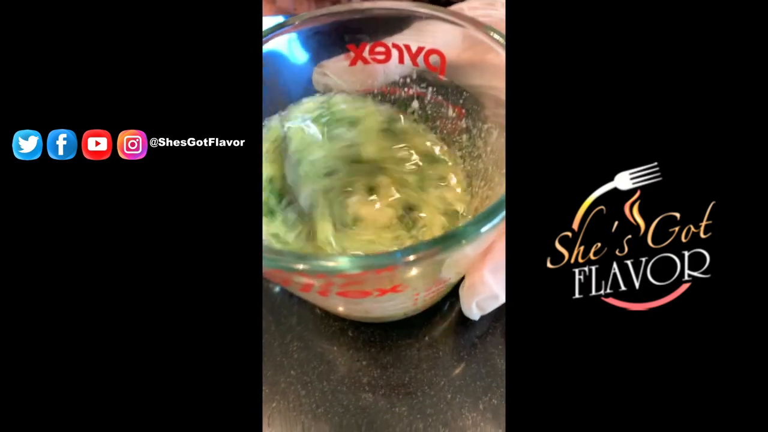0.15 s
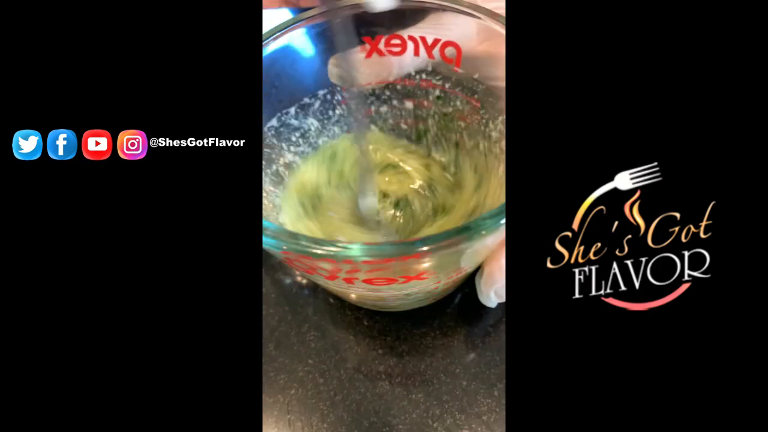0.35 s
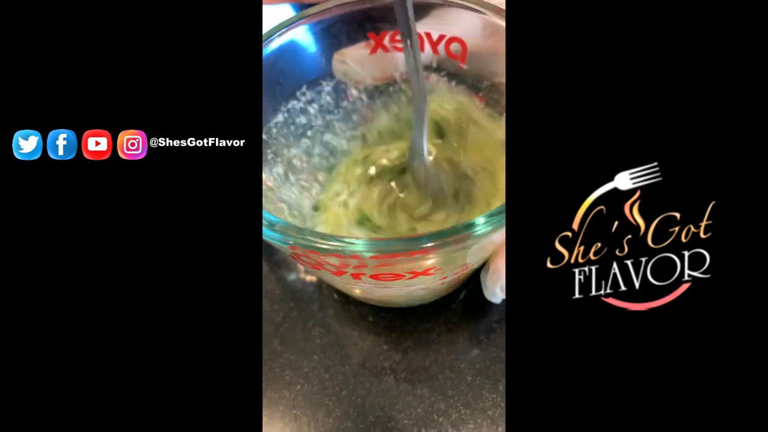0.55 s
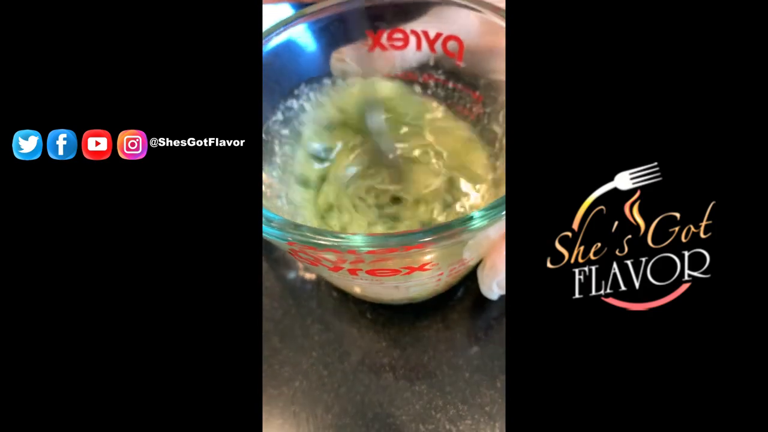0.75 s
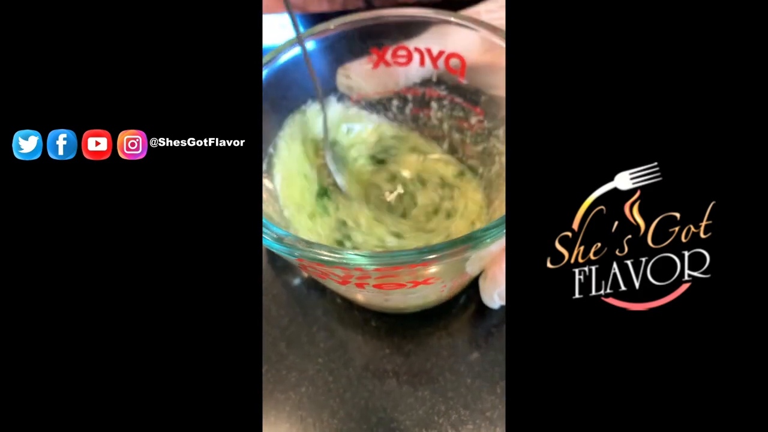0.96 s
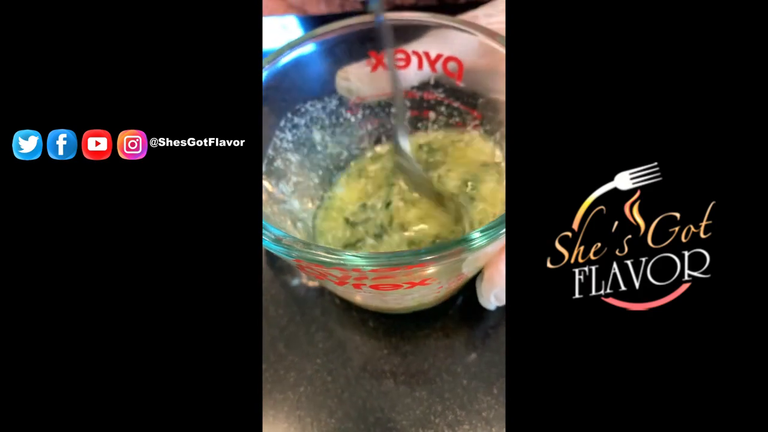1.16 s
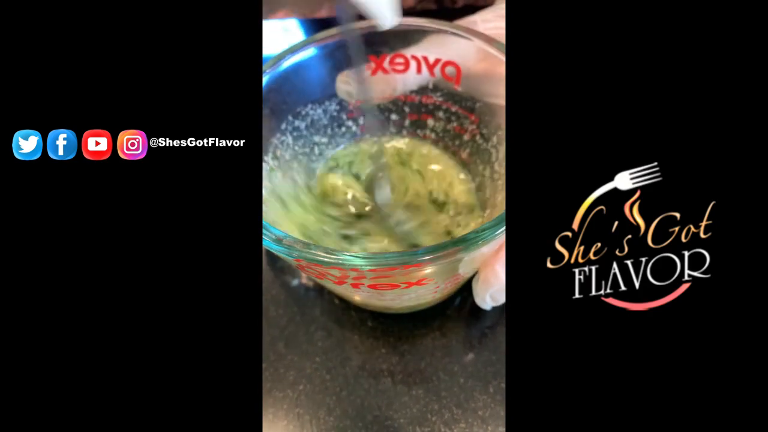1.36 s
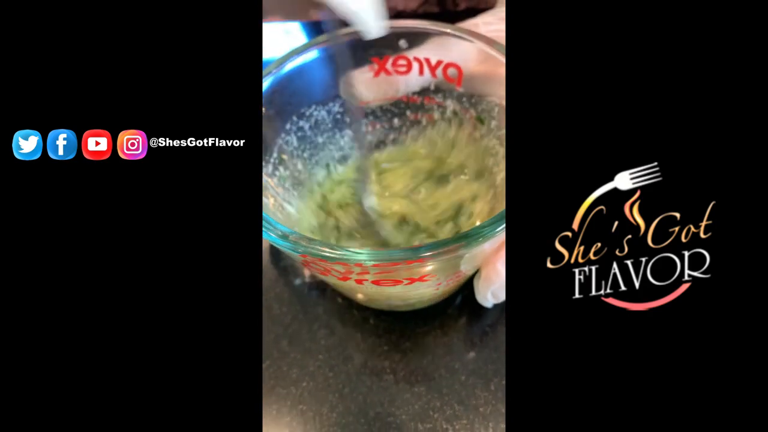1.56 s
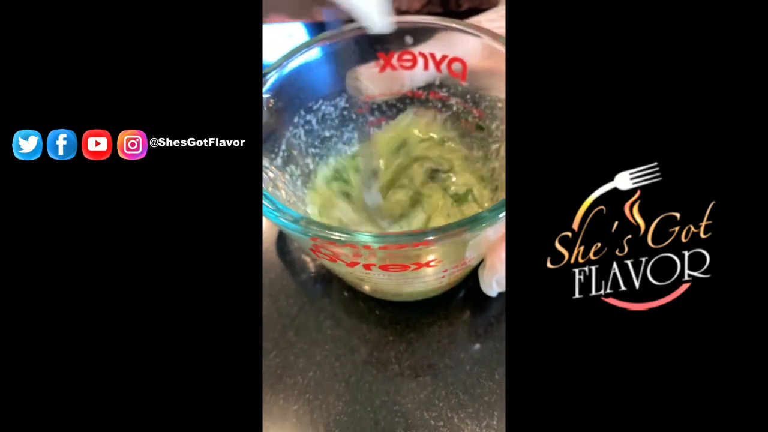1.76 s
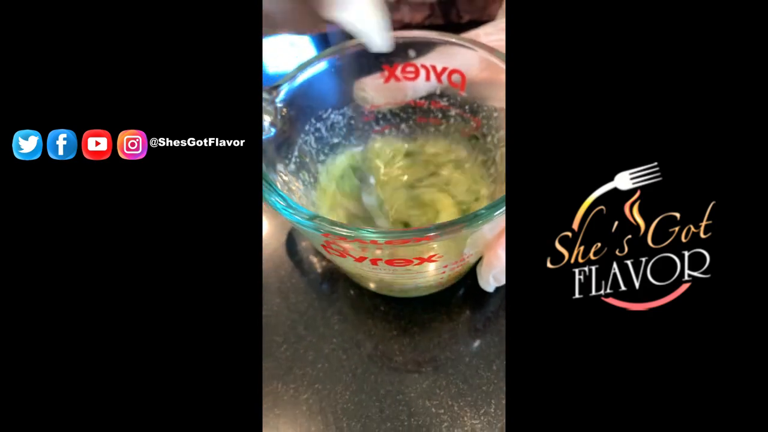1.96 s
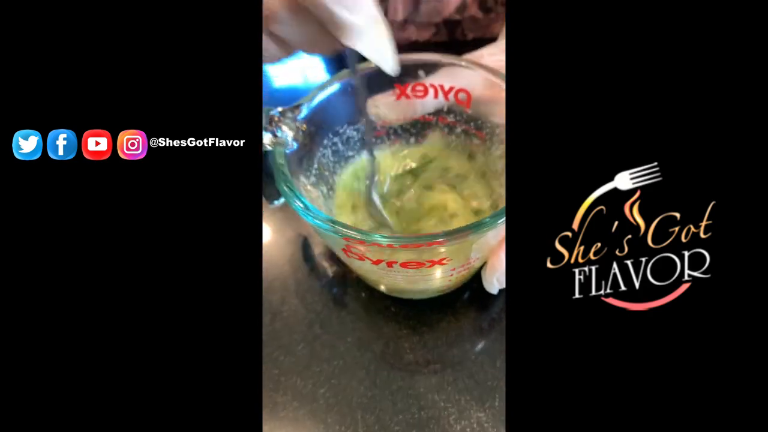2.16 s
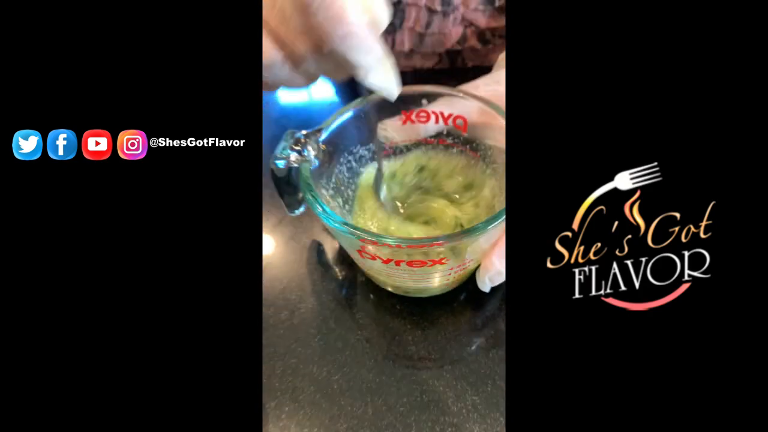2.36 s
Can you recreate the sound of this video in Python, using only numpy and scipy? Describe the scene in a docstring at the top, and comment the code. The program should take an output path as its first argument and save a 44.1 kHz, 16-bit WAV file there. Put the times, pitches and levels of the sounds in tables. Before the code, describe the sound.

Metal spoon stirring butter sauce, with short, uneven knocks and ticks on a glass cup.

```python
"""Stirring butter in a glass cup

A steel spoon stirs melted butter in a hand-held glass cup, close to a phone in a small kitchen.
Its knocks excite the damped modes of glass and steel, its edge ticks, and its sliding makes a
gritty friction noise. The walls reverberate briefly, and a refrigerator hums behind."""
import sys
import numpy as np
from scipy import signal
from scipy.fft import rfft, irfft, next_fast_len
from scipy.io import wavfile
from scipy.ndimage import map_coordinates

SR = 44100
rng = np.random.default_rng(int(sys.argv[2]) if len(sys.argv) > 2 else 0)


def bounce(signal):
    """Save signal as a 16-bit WAV file at the path given by the first command-line argument."""
    frames = np.transpose(np.atleast_2d(signal))
    limited = np.clip(frames, -1, 1)
    pcm = np.round(limited * 32767).astype(np.int16)
    wavfile.write(sys.argv[1], SR, pcm)


N = 110250
# The steel spoon's mode. Each row: frequency in Hz, relative level in dB, t60 in seconds.
SPOON_MODES = [(7190,0,0.052)]
CRACK_BAND_HZ = (5000, 15500)


def knocks():
    """Impact excitation: each blow cracks at contact and sets glass and spoon in free vibration."""
    # Each row: start in seconds, body level in dB, struck pitch in Hz,
    # bowl, clink and crack levels in dB, ring-time factor.
    blows = [(.095,-30,1688,-36.5,-30.5,-32,0.33),(0.1,-27,1127,-27.5,-35.5,-36,0.53),(0.109,-29.5,1126,-38,-38.5,-32,0.78),
             (0.2331,-10.5,1131,-24,-18,-11,0.51),(0.2353,-10.5,1624,-33,-33,-11.5,0.22),(0.2425,-21.5,1150,-31.5,-22.5,-29,0.64),(.404,-46,1110,-43,-63,-60,.5),
             (0.488,-30,1296,-67,-43.5,-63,0.21),(.525,-30.5,1450,-37,-32.5,-27,0.39),(.652,-44.5,1290,-52,-48,-48,1),(.661,-30,1220,-35.5,-39,-37,0.29),
             (.670,-34,1130,-37.5,-40,-42,0.53),(.751,-43,1300,-56,-53.5,-45,0.52),(0.848,-43,1490,-59,-46.5,-61,0.32),(.901,-33,1154,-39,-37.5,-34.5,0.45),
             (1.009,-26.5,1143,-26.5,-24.5,-21.5,0.47),(1.0285,-14,1492,-13.5,-17.5,-11.5,0.18),(1.031,-14.5,1130,-55,-24.5,-16.5,0.36),(1.0395,-35,1490,-28,-32,-69.5,0.71),
             (1.264,-21.5,1312,-30,-26,-32.5,0.52),(1.385,-15,1155,-14,-28,-25,0.27),(1.392,-36,870,-38.5,-68,-57,0.93),(1.5235,-21,1136,-20.5,-21,-24,0.31),
             (1.612,-31,1353,-30,-31.5,-21.5,0.29),(1.68,-45.5,1293,-71.5,-51,-39.5,0.71),(1.697,-41,1405,-66,-35.5,-32.5,0.53),(1.831,-49,1160,-69,-56,-37.5,0.69),(1.841,-48,1290,-72,-53,-39,0.89),
             (1.9504,-16.5,1262,-33.5,-30.5,-32,0.43),(2.156,-32.5,1100,-44,-52,-61,0.4)]
    # Middle and upper glass modes. Each row: frequency in Hz, relative level in dB, t60 in seconds.
    body_modes = [(850,6.5,0.035),(1093,3.5,0.061),(1204.7,16,0.03),(1348,9.5,0.022),(1570,6.5,0.074)]
    clink_modes = [(1980,4.5,0.027),(2567,-3,0.029),(2894,-4,0.047),(3207,-2.5,0.027),(4017,5.5,0.023)]
    # The lowest mode shifts as the butter sloshes. Each row: time in seconds, frequency in Hz.
    bowl_track = [(.1, 596), (.23, 511), (.5, 590), (.9, 557), (1.01, 529.4), (2.2, 518)]
    bowl_t60, spot_t60, crack_t60 = 0.052, 0.025, 0.0075  # seconds
    reach = 0.06  # in log pitch: a blow favours the modes this near its own pitch
    out, t = np.zeros(N + SR), np.arange(SR // 5) / SR
    for start, body_db, pitch, bowl_db, clink_db, crack_db, stretch in blows:
        coupling = np.exp(-(np.log(np.transpose(body_modes)[0] / pitch) / reach) ** 2) + 0.093
        body = ring(body_modes, t, stretch, coupling)
        body += amp(-4.5) * ring([(pitch, 0, spot_t60)], t, stretch)  # the struck spot
        bowl_hz = np.interp(start, *np.transpose(bowl_track))
        bowl = ring([(bowl_hz, 0, bowl_t60)], t, stretch)
        clink = ring(clink_modes, t, stretch) + 2.03 * snap(t, crack_t60, 3800, 5100)
        clink += amp(2) * snap(t, crack_t60, 1580, 2480)  # a lower clack
        clink += amp(-14.5) * ring(SPOON_MODES, t, stretch)
        crack = amp(7.5) * snap(t, crack_t60, *CRACK_BAND_HZ)
        blow = amp(body_db) * body + amp(bowl_db) * bowl + amp(clink_db) * clink + amp(crack_db) * crack
        out[round(start * SR):][:len(t)] += blow
    return out[:N]


def ticks():
    """Brief contacts have broad spectra: the spoon's edge snaps, with a trace of steel ring."""
    # Each row: start in seconds, level in dB, band centre in Hz.
    touches = [(0.157, -42.5, 7300), (0.311, -43, 4370), (0.4706, -44, 7570), (0.4953, -39, 7400),
               (0.5416, -36.5, 6500), (.837, -54, 1600), (1.219, -48.5, 1400), (1.256, -40.5, 1350),
               (1.4488, -44, 13900), (1.475, -40, 8750), (1.556, -37, 2270), (1.5862, -42.5, 6500),
               (1.721, -39, 4560), (1.7491, -28.5, 7600), (1.822, -44.5, 1300), (1.878, -37, 11800),
               (1.956, -36.5, 6680), (2.022, -41, 2940), (2.0431, -43, 8100), (2.0686, -40.5, 11300),
               (2.178, -29, 6700), (2.24, -39, 12060), (2.382, -56, 3190), (2.4146, -46, 11150)]
    t60, half_width = 0.014, 0.37  # seconds; fraction of the centre
    out, t = np.zeros(N + SR), np.arange(SR // 10) / SR
    for start, db, hz in touches:
        touch = snap(t, t60, hz * (1 - half_width), hz * (1 + half_width))
        touch += amp(-3.5) * snap(t, t60, *CRACK_BAND_HZ)
        touch += amp(-26) * ring(SPOON_MODES, t, 1.0)
        out[round(start * SR):][:len(t)] += amp(db) * touch
    return out[:N]


def drag():
    """Sliding friction: the spoon on buttered glass makes a rustle in the cup and a gritty hiss."""
    # Each row: time in seconds, rustle level in dB, hiss level in dB.
    stroke = [(0,-63,-62.5),(.2,-54.5,-62.5),(.5,-56,-64.5),(0.951,-62,-69),(1.451,-57.5,-64.5),(1.8,-66,-64.5),(2.19,-63.5,-68.5),(2.36,-67,-68.5)]
    # Friction spectra. Each row: frequency in Hz, relative density in dB.
    rustle_shape = [(400,-17),(520,0.5),(800,-14.5),(1200,-3.5),(2000,-10.5),(2700,-24.5),(4500,-24.5)]
    hiss_shape = [(2500,0),(4000,4),(8000,3),(13500,7),(15000,-2),(16500,-25)]
    grit_per_s, grit_fade_s = 110, 0.0009  # wet ticks that briefly lift the hiss
    times, rustle_db, hiss_db = np.transpose(stroke)
    t = np.arange(N) / SR
    grit = (rng.random(N) < grit_per_s / SR) * amp(5 + 5 * rng.standard_normal(N))
    grain = 1 + signal.lfilter([1], [1, -np.exp(-1 / (grit_fade_s * SR))], grit)
    rustle = filtered(rng.standard_normal((2, N)), lambda hz: amp(along(rustle_shape, hz)) * (hz < 6000))
    hiss = filtered(rng.standard_normal(N) * grain, lambda hz: amp(along(hiss_shape, hz)) * (hz > 2000))
    rustle = unit(rustle) * amp(np.interp(t, times, rustle_db) + 3 * wobble(18))
    hiss = unit(hiss) * amp(np.interp(t, times, hiss_db) + 2.3 * wobble(30.25))
    return rustle + hiss


def kitchen(x):
    """Diffuse reverberation: each stretch of sound is convolved with a fresh, decaying noise tail."""
    # Each row: frequency in Hz, reverberation time in seconds.
    decay_times = [(400, 0.29), (1300, 0.42), (4000, .3), (12000, 0.19)]
    x = filtered(x, lambda hz: 1 / (1 + 1j * hz / 5250))  # the walls give back little treble
    out, step, delay = np.zeros((2, N + SR)), SR // 8, 200
    for start in range(0, N, step):
        hz, t, spectra = signal.stft(rng.standard_normal((2, SR // 2)), SR, nperseg=256)
        decay = amp(-60 * t / along(decay_times, hz)[:, None])
        tail = signal.istft(spectra * decay, SR, nperseg=256)[1]
        wet = signal.fftconvolve(x[None, start:start + step], tail / np.linalg.norm(tail[0]), axes=1)
        out[:, start + delay:start + delay + wet.shape[1]] += wet
    return out[:, :N]


def fridge():
    """Periodic vibration: a compressor's line spectrum stands over the low noise of the room's air."""
    # Each row: frequency in Hz, rms level in dB.
    hum = [(53,-47),(58.9,-70.5),(106,-63.5),(117.8,-64.5),(193.8,-76),(371.7,-66.5)]
    # Room noise. Each row: frequency in Hz, relative density in dB.
    air_shape = [(25,-28.5),(45,-1.5),(110,-9.5),(200,-4.5),(380,-13.5),(520,-24),(800,-33),(3000,-47.5)]
    # Each row: frequency in Hz, left-right correlation of that noise.
    coherence = [(60,0.88),(200,0.63),(900,.1)]
    t = np.arange(N) / SR
    tones = sum(np.sqrt(2) * amp(db + 0.35 * wobble(2.3)) * np.sin(2 * np.pi * (hz * t + rng.random()))
                for hz, db in hum)

    def mid_side(hz):
        angle = np.arccos(np.clip(along(coherence, hz), -1, 1)) / 2
        return amp(along(air_shape, hz)) * [np.cos(angle), np.sin(angle)]

    mid, side = filtered(rng.standard_normal((2, N)), mid_side)
    return tones + amp(-57) * unit(np.array([mid + side, mid - side]))


def ring(modes, t, stretch, weight=1):
    """Modal superposition: damped sines, scattered slightly in strength and pitch at each blow."""
    rise_cycles, choke = 1.1, 1.8  # soft buttered contact; damping grows as the butter closes in
    hz, db, t60 = np.transpose(modes)[..., None]
    gain = amp(db[:, 0] + 2 * rng.standard_normal(len(hz))) * weight
    hz = hz * (1 + 0.008 * rng.standard_normal(hz.shape))
    rise = (1 - np.exp(-t * hz / rise_cycles)) ** 2
    decay = amp(-60 * (t / (stretch * t60)) ** choke)
    return gain @ (rise * decay * np.sin(2 * np.pi * hz * t)) / np.linalg.norm(gain)


def snap(t, t60, low_hz, high_hz, rise_s=0.00065):
    """A contact transient: band-limited noise with exponential decay."""
    band = signal.butter(2, [low_hz, min(high_hz, 20000)], "bandpass", fs=SR, output="sos")
    noise = unit(signal.sosfilt(band, rng.standard_normal(len(t))))
    return noise * amp(-60 * t / t60) * (1 - np.exp(-t / rise_s))


def amp(db):
    """Decibels as an amplitude ratio."""
    return 10 ** (np.asarray(db) / 20)


def unit(x):
    """Normalisation to unit rms."""
    return x / np.sqrt(np.mean(x ** 2) + 1e-20)


def along(points, hz):
    """Interpolation of (Hz, value) points on a log-frequency axis."""
    knots, values = np.transpose(points)
    return np.interp(np.log(hz + 1), np.log(knots + 1), values)


def filtered(x, response):
    """Linear filtering: the spectrum times a complex frequency response."""
    size = next_fast_len(x.shape[-1] + 4096)
    return irfft(rfft(x, size) * response(np.fft.rfftfreq(size, 1 / SR)), size)[..., :x.shape[-1]]


def wobble(rate):
    """A smooth random curve with rate knots a second."""
    return map_coordinates(rng.standard_normal(int(N * rate / SR) + 4), [np.arange(N) * rate / SR])


def scene():
    """Superposition at two microphone ports; the cup reaches them unequal in level and phase."""
    # Each row: frequency in Hz, level of the left port over the right in dB.
    shading = [(200,6.5),(600,-1.5),(1300,-7.5),(2700,-6.5),(5000,-5.5)]
    # Each row: frequency in Hz, phase lead of the left port in radians.
    phase_lead = [(200,0.011),(700,1.5),(1300,0.088),(2200,0.79),(2700,2.21),(3300,1.38)]

    def ports(hz):
        half_db = along(shading, hz) / 2
        return np.array([amp(half_db), amp(-half_db) * np.exp(-1j * along(phase_lead, hz))])

    cup = knocks() + ticks()
    return filtered(cup, ports) + amp(-15.5) * kitchen(cup) + drag() + fridge()


def record(dry):
    """A crossover: above it the left port feeds both sides, the right inverted and late."""
    split_hz, lag_s, rolloff_hz, limit_hz = 4090, 0.0002041, 13780, 16700
    low = lambda hz: 1 / (1 + (hz / split_hz) ** 10)
    spread = lambda hz: (1 - low(hz)) * np.array([np.ones_like(hz), -np.exp(-2j * np.pi * hz * lag_s)])
    microphone = lambda hz: (hz < limit_hz) / np.sqrt(1 + (hz / rolloff_hz) ** 20)
    return filtered(filtered(dry, low) + filtered(dry[0], spread), microphone)


dry = scene()
out = record(dry)
bounce(out)
```